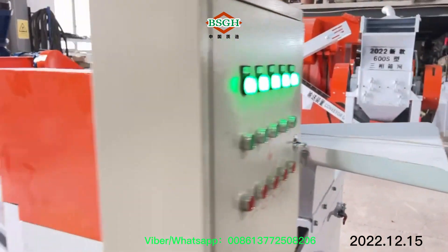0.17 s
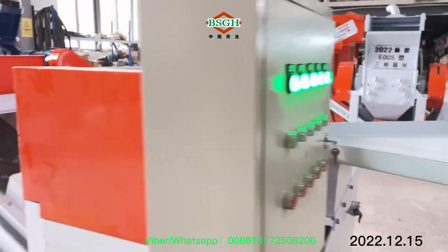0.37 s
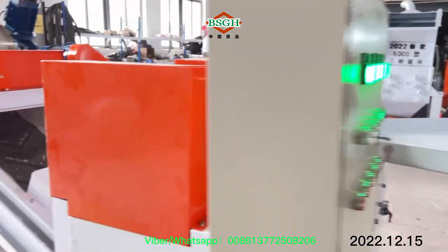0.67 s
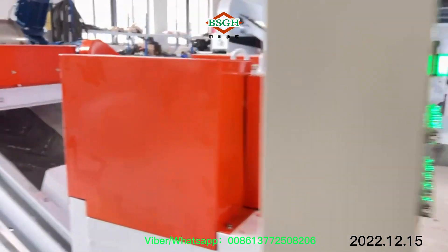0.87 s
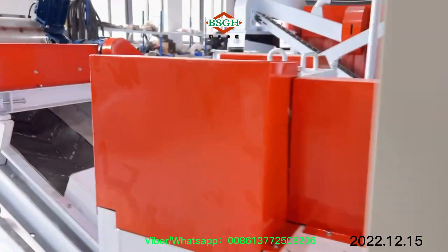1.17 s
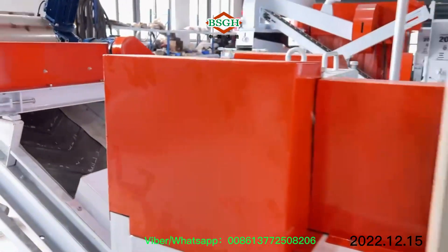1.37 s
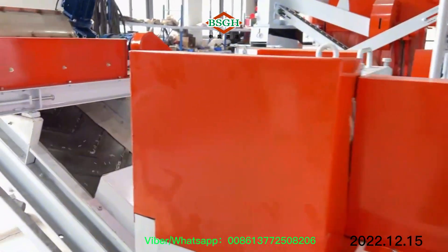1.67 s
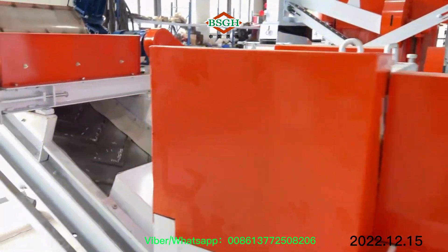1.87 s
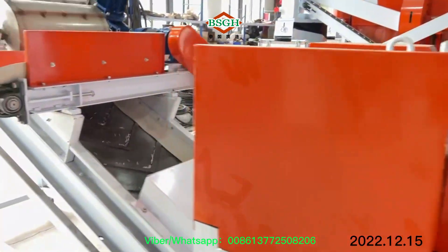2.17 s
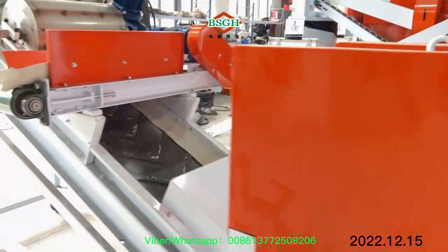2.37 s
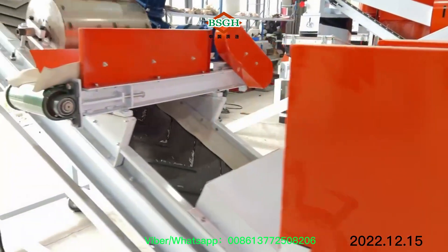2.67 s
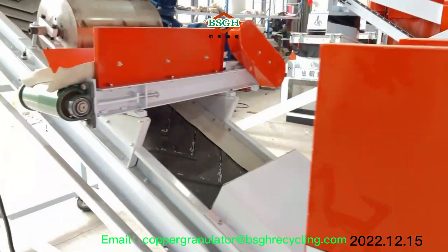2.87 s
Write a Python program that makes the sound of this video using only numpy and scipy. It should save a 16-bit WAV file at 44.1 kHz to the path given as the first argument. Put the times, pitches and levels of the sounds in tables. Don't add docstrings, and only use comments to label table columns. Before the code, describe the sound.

Cable granulator running with fast rotor knocking, gear whine, motor hum and hiss in a large workshop

```python
import sys
import numpy as np
from scipy import signal
from scipy.fft import rfft, irfft, next_fast_len
from scipy.io import wavfile
from scipy.ndimage import uniform_filter1d

SR = 44100
rng = np.random.default_rng(int(sys.argv[2]) if len(sys.argv) > 2 else 0)


def invert_db(level):
    return 10 ** (np.asarray(level, dtype=float) / 20)


def log_audio(samples):
    frames = np.atleast_2d(samples).T
    limited = np.clip(frames, -1, 1)
    pcm = np.round(limited * 32767).astype(np.int16)
    wavfile.write(sys.argv[1], SR, pcm)


N = 132741
T = np.arange(N) / SR
FFT_SIZE = next_fast_len(N)
F = np.maximum(np.fft.rfftfreq(FFT_SIZE, 1 / SR), 1)
SHAFT_HZ = 10.67

# (frequency [Hz], level per Hz [dB])
FLOOR_TONE = [(20, -18), (35, -15.5), (60, -10), (95, 2.5), (125, -2), (160, -13)]
# (time [s], level [dB])
HOUSING_LEVEL = [(0, -27), (.3, -25), (1, -26.5), (1.8, -25.5), (2.1, -23), (2.45, -23), (2.7, -25),
                 (3.01, -24.5)]
# (frequency [Hz], level per Hz [dB])
HOUSING_TONE = [(110, -29), (140, -14), (166, -3), (210, 0), (256, -7), (406, -11), (700, -20.5)]
# (frequency [Hz], width [Hz], level [dB])
PANEL_RINGS = [
    (185.5, 27.3, -10.5),
    (253.6, 63, -15.5),
    (450.2, 43, -11.5),
]
HUM_HZ = [167.7, 237, 261.8, 324.0, 365.5, 470.9, 533.5, 586.5, 639, 722]
# (rms level [dB], loudest time [s], fade one second away [dB])
HUM_LEVELS = [(-6, 1.7, 0.4), (-20, 1.5, -7.5), (-3.5, 2.5, 2), (-7, 2.35, 1.5), (-12.5, 2., 0.5),
              (-14, 2.5, 1.), (-5.5, 1.73, 6.5), (-16, 2.3, -0.5), (-29.5, 3.1, -1), (-14, 1.67, 20)]
# (time [s], level [dB])
CONVEYOR_LEVEL = [(0, -26), (.5, -28), (1, -25.5), (2.05, -26.5), (2.3, -27), (2.7, -27), (3.01, -31)]
# (frequency [Hz], level per Hz [dB])
CONVEYOR_TONE = [(350, -4), (500, 0), (650, -1), (800, -10), (1050, -6.5), (1400, -6.5), (1700, -18),
                 (2500, -22.5)]
# (time [s], level [dB])
CUTTER_PATH = [(0, -29), (.4, -29), (.5, -31), (1.35, -29.5), (1.48, -27), (1.6, -30.5), (1.98, -28),
               (2.04, -28), (2.1, -28.5), (2.17, -31), (2.24, -35.5), (2.41, -42), (2.5, -38), (2.6, -42),
               (2.8, -39), (2.96, -41.5), (3.01, -37)]
# (frequency [Hz], level per Hz [dB])
HISS_TONE = [(900, -11.5), (1400, -1.5), (2200, 1), (3000, -5.5), (5000, -8), (6000, -8.5), (9000, -5.5),
             (15500, -8)]
# (time [s], peak level [dB], t60 [s])
RATTLE_HITS = [(1.062, -35, 0.092), (1.14, -38, 0.17), (2.025, -29, 0.12), (2.4175, -28.5, 0.19),
               (2.433, -30.5, 0.45), (2.495, -44, 0.47), (2.6055, -27, 0.31), (2.640, -31, 0.72),
               (2.69, -45, .4), (2.745, -35.5, 0.17), (2.981, -37, 1.2)]
# (frequency [Hz], level per Hz [dB])
RATTLE_TONE = [(700, -10), (1500, 7), (2500, 2.5), (4500, 1.5), (9000, -0.5), (15500, 1)]
# (frequency [Hz], width [Hz], level [dB])
RATTLE_RINGS = [(2130, 50, -13.5), (3310, 280, -16.5), (4020, 200, -14), (6200, 130, -25)]
# (time [s], frequency [Hz], level [dB], length [s])
SQUEAKS = [
    (2.386, 8400, -35, 0.022),
    (2.490, 7840, -45, 0.02),
    (2.737, 7470, -35.5, 0.052),
]
# (time [s], peak level [dB], t60 [s])
TINKLE_HITS = [(0.0817, -39, 0.17), (0.2704, -34, 0.2), (0.3874, -25, 0.18), (0.4823, -23, 0.2),
               (0.5464, -18, 0.23), (0.6454, -20, 0.22), (0.7038, -20, 0.2), (0.8614, -23, 0.2),
               (1.0224, -20, 0.18), (1.1388, -18, 0.19), (1.2094, -18.5, 0.17), (1.3054, -19, 0.2),
               (1.3344, -23, 0.18), (1.4262, -21.5, 0.26), (1.4616, -21, 0.2), (1.5184, -17.5, 0.23),
               (1.6354, -22, 0.2), (1.6694, -21, 0.26), (1.7694, -25, 0.41), (1.9824, -17, 0.2),
               (2.0208, -14, 0.18), (2.4174, -31, 0.2), (2.4354, -32, 0.18), (2.4927, -26, 0.2),
               (2.6364, -31, 0.26), (2.7596, -28, 0.18), (2.981, -20.5, 0.22)]
# (frequency [Hz], level per Hz [dB])
TINKLE_TONE = [(6000, -8.5), (8500, 0), (12000, 3), (15500, -5)]
# (time [s], level [dB])
DRIVE_LEVEL = [(0, -33.5), (.95, -40), (1.1, -38), (1.5, -36.5), (2.15, -35), (2.28, -50), (2.69, -40.5),
               (2.92, -53), (3.01, -62)]
WHINE_HZ = [2113.3, 2199, 2019, 1025, 1346, 961, 1057, 1248, 1409, 2552, 3235, 3478]
# (rms level [dB], loudest time [s], fade one second away [dB])
WHINE_LEVELS = [(1.5, 1.38, 13), (-2, 1.73, 8), (-21, 1.6, 2), (4, 1.2, 17.5), (1, 1.31, 18), (-5.5, .5, 8),
                (-3, 0.71, 4), (-8.5, 0.9, 7), (-3.5, 0.45, 3.5), (-9.5, 0.5, 1.5), (-10, 1.1, 4),
                (-10.5, 0.95, 3)]
# (frequency [Hz], width [Hz], level [dB])
CASE_RINGS = [(990, 21, 6.5), (1330, 150, 4), (1220, 44, -14), (1740, 400, -14), (2140, 150, 3),
              (2580, 71, -14), (3330, 560, -4)]
# (frequency [Hz], diffuse share [dB])
DIFFUSE = [(30, -16), (70, -25), (150, -23.5), (300, -17.5), (600, -8), (1200, -5), (2500, -5.5),
           (5000, -1), (7800, -19)]
# (frequency [Hz], left minus right [dB])
PAN = [(60, 0.5), (250, -1.2), (500, -1.8), (1000, 1.8), (2000, -0.6), (4000, 1.8), (8000, 0)]
# (frequency [Hz], lead [half turns])
PORT_TURN = [(6800, 0), (7700, .15), (9000, .335), (10050, .5), (11050, .645), (12200, .8), (13400, .95),
             (14900, 1.17), (15300, 1.34), (16000, 1.42)]
# (frequency [Hz], weakest kept detail against the band mean [dB])
THIN = [(1500, -15.5), (3000, -9), (7500, -1.5), (8500, -4), (11000, 0), (12500, 0.5), (14500, 1),
        (15500, 1.5)]


def unit(x):
    return x / np.sqrt(np.mean(x ** 2))


def curve(rows):
    return np.interp(T, *np.array(rows).T)


def over_hz(rows, hz):
    rows = np.array(rows)
    return np.interp(np.log(hz), np.log(rows[:, 0]), rows[:, 1])


def ring(x, hz, width):
    return signal.lfilter(*signal.iirpeak(hz, hz / width, fs=SR), x)


def walk(rate):
    hold = int(SR / rate)
    steps = np.repeat(rng.standard_normal(N // hold + 1), hold)
    return 1.317 * uniform_filter1d(uniform_filter1d(steps, hold), hold)[:N]


def air(tone, swell_db, flicker_db, rate):
    low, high = tone[0][0], tone[-1][0]
    spec = rfft(rng.standard_normal((2, FFT_SIZE))) * invert_db(over_hz(tone, F))
    spec = spec / (1 + (low / 2.1 / F) ** 4) / (1 + (F / high / 1.32) ** 4)
    swell = swell_db * walk(rate)
    out = 0
    for octave in range(int(np.log2(low)) - 1, int(np.log2(high)) + 3):
        band = np.clip(1 - np.abs(np.log2(F) - octave), 0, 1)
        flicker = flicker_db * walk(2 * rate)
        out = out + irfft(spec * band, FFT_SIZE)[:, :N] * invert_db(swell + flicker)
    return unit(out)


def lines(tones, rows, wander_db, wander_hz, throb_db, rate):
    out = np.zeros((2, N))
    for hz, (db, top, fade) in zip(tones, rows):
        phase = 2 * np.pi * np.cumsum(hz + wander_hz * walk(rate)) / SR
        throb = throb_db * np.cos(2 * np.pi * (SHAFT_HZ * T + rng.random()) + walk(3.06))
        passing = db - abs(fade) * (T - top) ** 2
        for c in range(2):
            gain = invert_db(passing + wander_db * walk(rate) + throb)
            out[c] += gain * np.sqrt(2) * np.sin(phase + 2 * np.pi * rng.random())
    return out


def bursts(rows):
    attack_s = .0008
    power = np.zeros(N)
    for start, db, t60 in rows:
        age = np.maximum(T - start, 0)
        decay = np.exp(-2 * np.log(1000) * age / t60)
        power += invert_db(2 * db) * (1 - np.exp(-age / attack_s)) * decay
    return np.sqrt(power)


def floor_shake():
    return invert_db(-35) * air(FLOOR_TONE, 0.32, 0.33, 2.8)


def housing():
    push = rng.standard_normal((2, N))
    boom = sum(invert_db(db) * unit(ring(ring(push, hz, w), hz, w)) for hz, w, db in PANEL_RINGS)
    rumble = invert_db(-1.0) * air(HOUSING_TONE, 0.3, 1.4, 9.7)
    hum = lines(HUM_HZ, HUM_LEVELS, 3.1, 3.01, 3.85, rate=26.)
    return invert_db(curve(HOUSING_LEVEL)) * (rumble + boom + hum)


def conveyor():
    return invert_db(curve(CONVEYOR_LEVEL)) * air(CONVEYOR_TONE, 0.47, 0.94, 9)


def cutter_hiss():
    jet_hz, jet_width_hz, jet_db, jet_fade_db_s = 6000, 450, -38, 13
    hiss = air(HISS_TONE, 0.49, 1.05, 7)
    jet = invert_db(jet_db - jet_fade_db_s * T) * unit(ring(hiss, jet_hz, jet_width_hz))
    return invert_db(curve(CUTTER_PATH) + 3.5) * hiss + jet


def tinkles():
    return invert_db(-7) * bursts(TINKLE_HITS) * air(TINKLE_TONE, 0.79, 1., 80)


def squeaks(noise):
    out = np.zeros((2, N))
    for start, hz, db, length in SQUEAKS:
        shape = np.sin(np.pi * np.clip((T - start) / length, 0, 1))
        rough = 0.73 * unit(ring(noise, hz, 200.))
        out += invert_db(db) * shape * (np.sin(2 * np.pi * hz * T) + rough)
    return out


def rattles():
    noise = air(RATTLE_TONE, .6, 1.3, 60)
    rings = sum(invert_db(db) * unit(ring(noise, hz, w)) for hz, w, db in RATTLE_RINGS)
    return invert_db(5.0) * bursts(RATTLE_HITS) * (noise + rings) + squeaks(noise)


def whine():
    return lines(WHINE_HZ, WHINE_LEVELS, 2.5, 2.17, 2.0, rate=13.9)


def rotor():
    rotor_hz, jitter_turns, force_db, smear_s = 32.02, .002, 3.1, 0.0096
    chance = rng.standard_normal((120, 2))
    at = ((1 + np.arange(120) + jitter_turns * chance[:, 0]) / rotor_hz * SR).astype(int)
    pulses = np.zeros(N)
    pulses[at[at < N]] = invert_db(force_db * chance[at < N, 1])
    smear = rng.standard_normal((2, 3000)) * np.exp(-np.arange(3000) / SR / smear_s)
    smeared = np.array([signal.fftconvolve(pulses, s)[:N] for s in smear])
    return invert_db(1.5) * unit(sum(invert_db(db) * ring(smeared, hz, w) for hz, w, db in CASE_RINGS))


def granulator():
    return invert_db(curve(DRIVE_LEVEL)) * (rotor() + whine())


def scene():
    background = floor_shake() + housing() + conveyor() + cutter_hiss()
    direct, hall = rfft(background + tinkles() + rattles() + granulator(), FFT_SIZE)
    hall = hall * invert_db(over_hz(DIFFUSE, F))
    turn = np.exp(1j * np.pi * np.interp(F, *np.array(PORT_TURN).T))
    pan = invert_db(over_hz(PAN, F) / 2)
    left = (direct + hall) / turn * pan
    right = (direct - hall) * turn / pan
    return irfft(np.array([left, right]), FFT_SIZE)[:, :N]


def thin_treble(x):
    from_hz, mid_drop_db, side_drop_db, ragged_db, patchy_db = 7300, -5.5, -3, 2, 3.3
    lead, bins = 408, 16
    frame = dict(fs=SR, nperseg=2048, window="cosine")
    sum_diff = np.array([x[0] + x[1], x[0] - x[1]]) / 2
    hz, _, z = signal.stft(np.pad(sum_diff, ((0, 0), (lead, 0))), **frame)
    band = np.arange(len(hz)) // bins
    power = np.add.reduceat(abs(z) ** 2, np.arange(0, len(hz), bins), axis=1) / bins
    drop = np.array([mid_drop_db, side_drop_db])[:, None, None]
    drop = drop + ragged_db * rng.standard_normal(power.shape)
    kept = (power > invert_db(2 * drop) * power[::-1])[:, band] | (hz < from_hz)[:, None]
    strong = abs(z) ** 2 > power[:, band] * invert_db(2 * over_hz(THIN, hz + 1))[:, None]
    patch_depth = np.clip(hz / from_hz - .5, 0, 1)[:, None]
    patchy = invert_db(patchy_db * rng.standard_normal(power.shape)[:, band] * patch_depth)
    mid, side = signal.istft(z * kept * strong * patchy, **frame)[1][:, lead:lead + N]
    return np.array([mid + side, mid - side])


def top_cut(x):
    return signal.sosfilt(signal.butter(12, 15800, fs=SR, output="sos"), x)


def record(dry):
    top_hz = 15800
    x = signal.sosfilt(signal.ellip(8, .2, 70, top_hz, fs=SR, output="sos"), dry)
    mix = thin_treble(x)
    return top_cut(mix)


dry = scene()
out = record(dry)
log_audio(out)
```